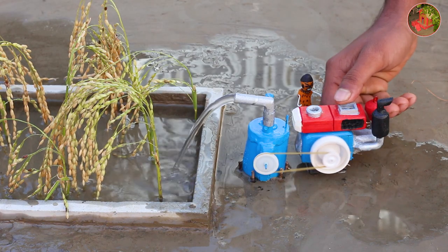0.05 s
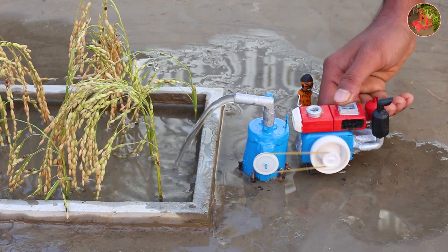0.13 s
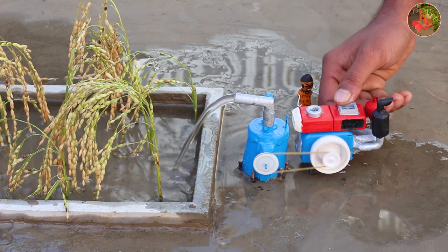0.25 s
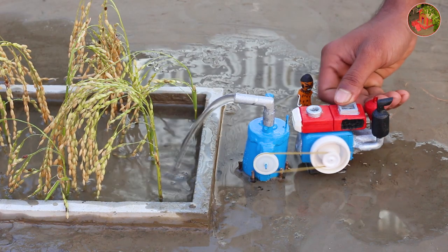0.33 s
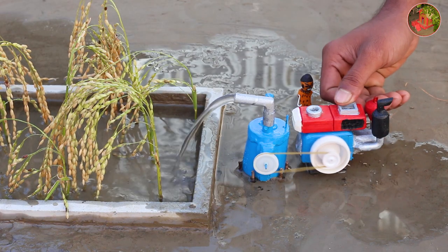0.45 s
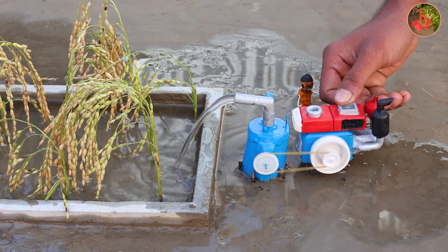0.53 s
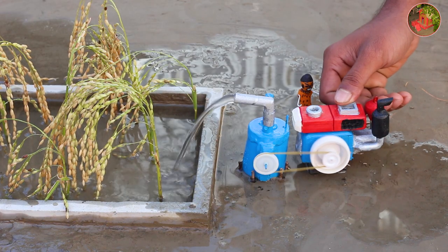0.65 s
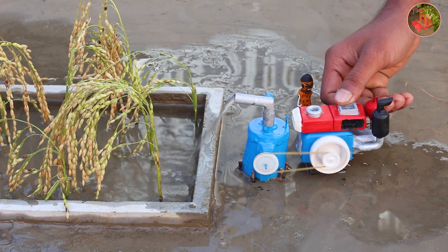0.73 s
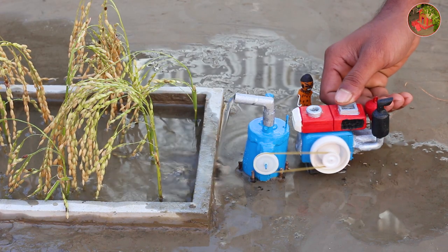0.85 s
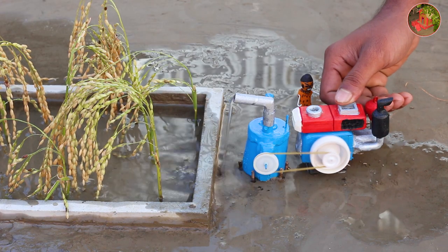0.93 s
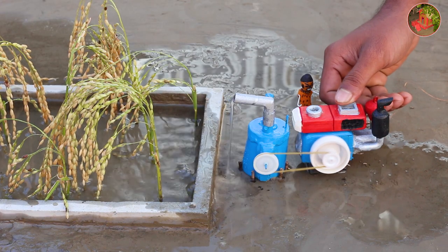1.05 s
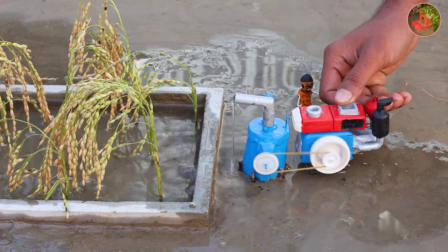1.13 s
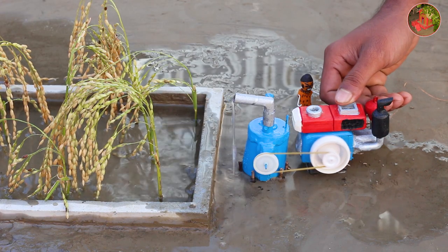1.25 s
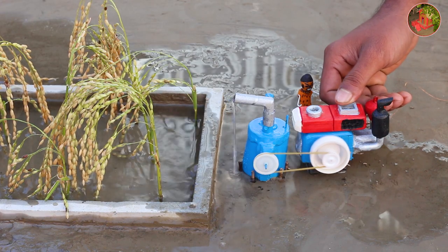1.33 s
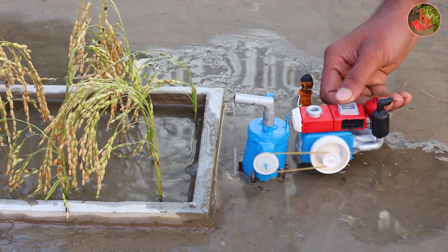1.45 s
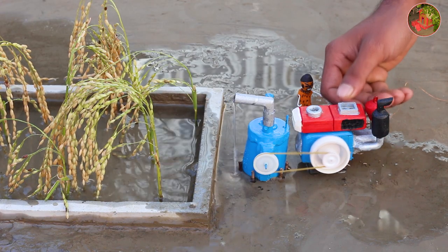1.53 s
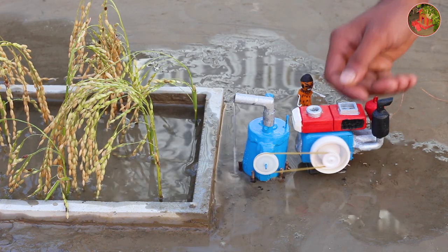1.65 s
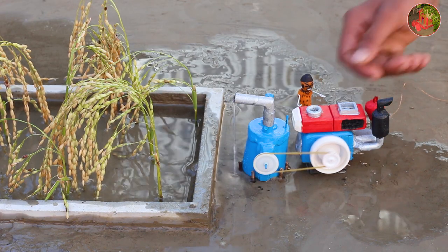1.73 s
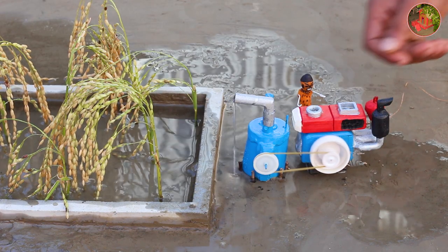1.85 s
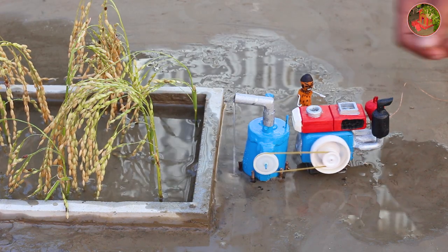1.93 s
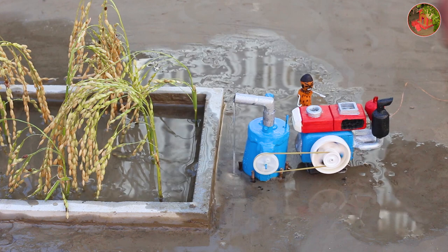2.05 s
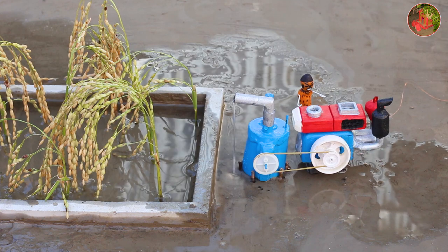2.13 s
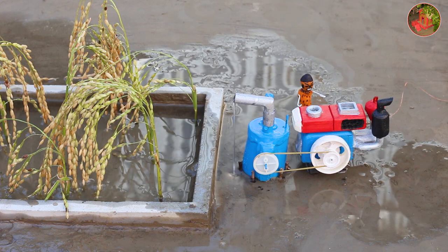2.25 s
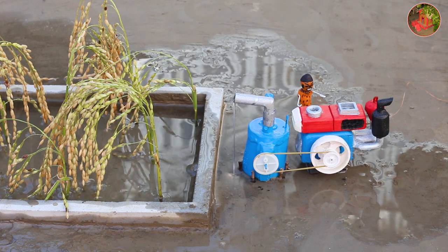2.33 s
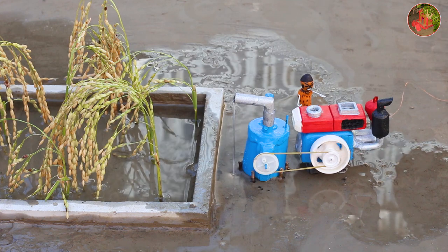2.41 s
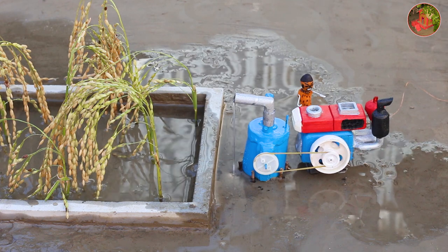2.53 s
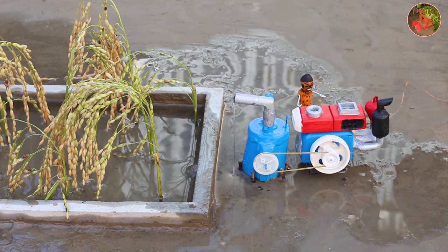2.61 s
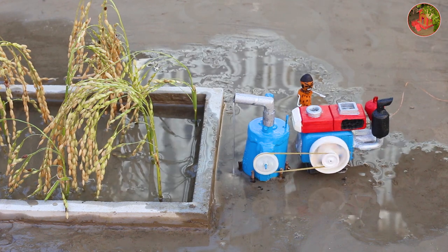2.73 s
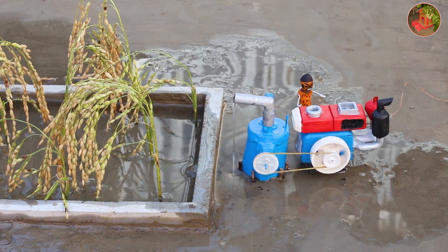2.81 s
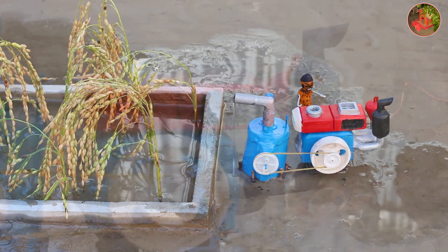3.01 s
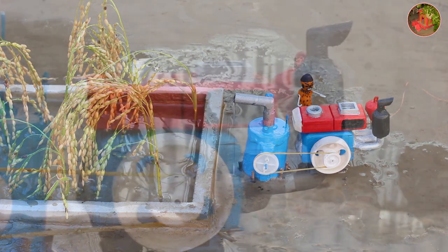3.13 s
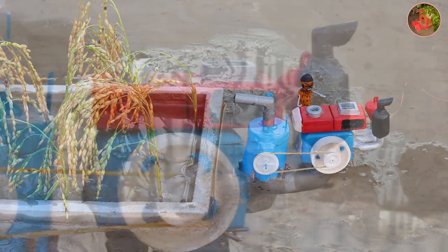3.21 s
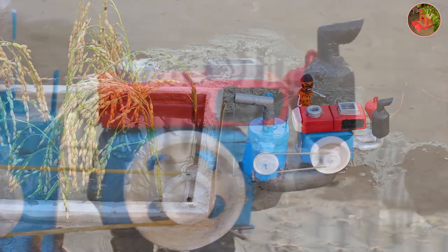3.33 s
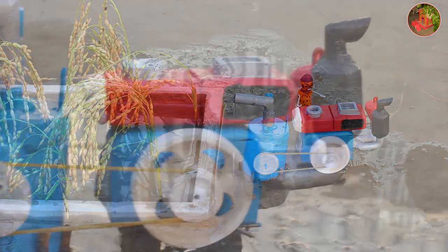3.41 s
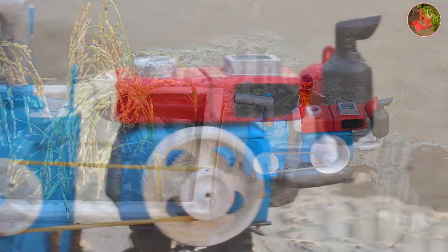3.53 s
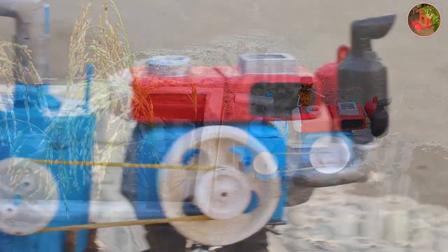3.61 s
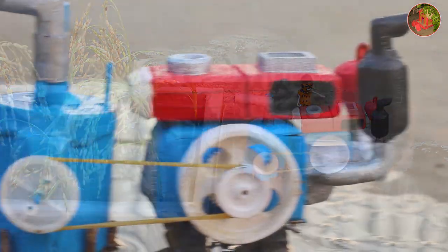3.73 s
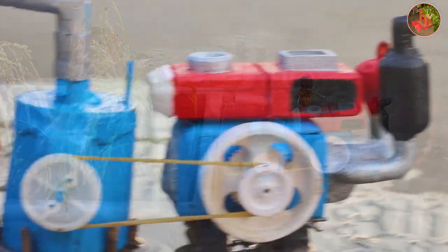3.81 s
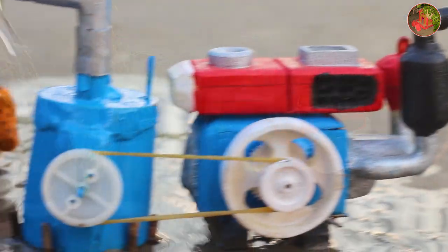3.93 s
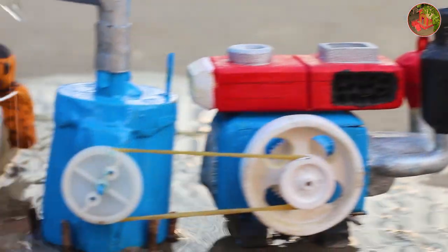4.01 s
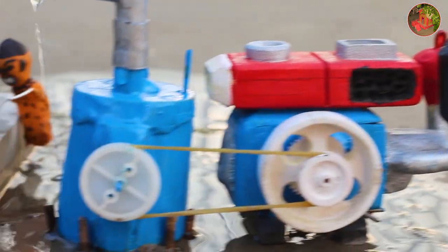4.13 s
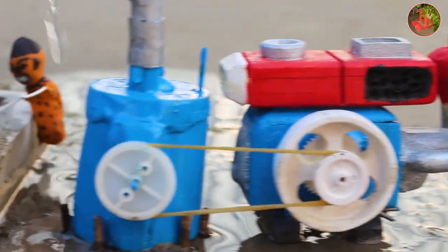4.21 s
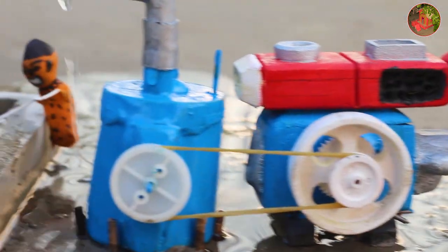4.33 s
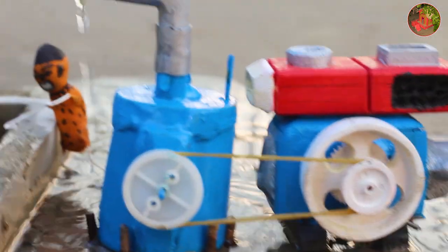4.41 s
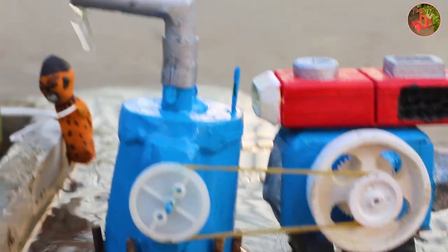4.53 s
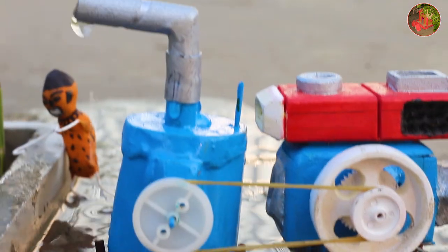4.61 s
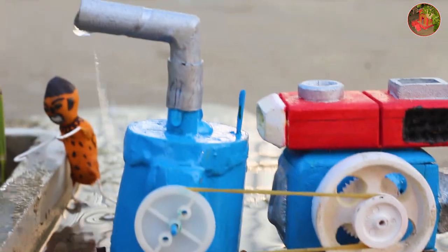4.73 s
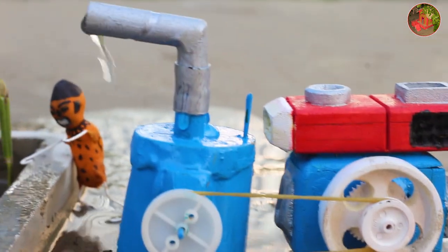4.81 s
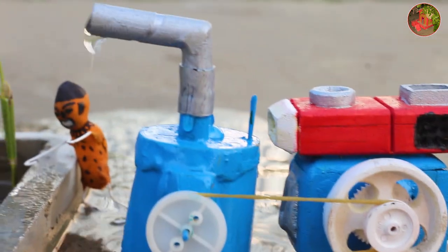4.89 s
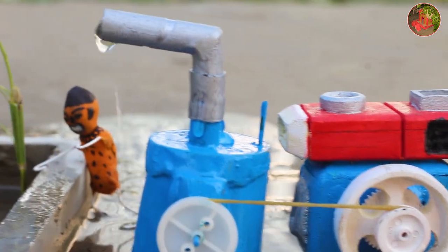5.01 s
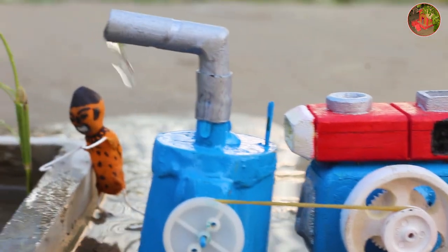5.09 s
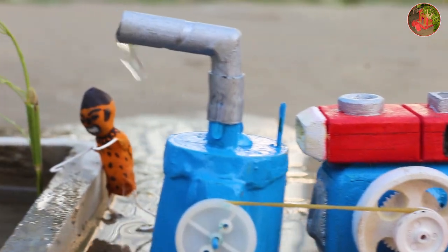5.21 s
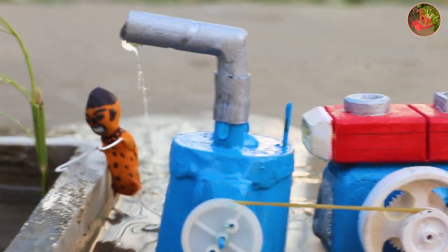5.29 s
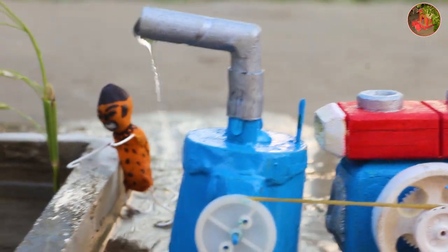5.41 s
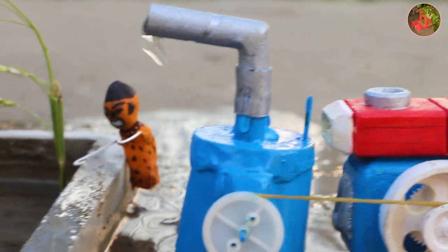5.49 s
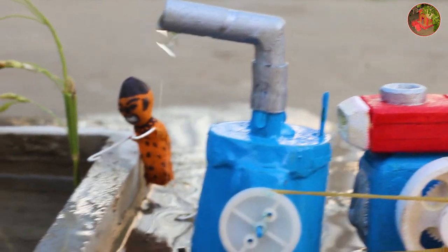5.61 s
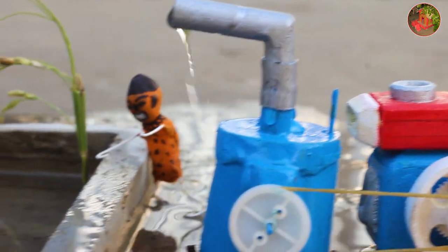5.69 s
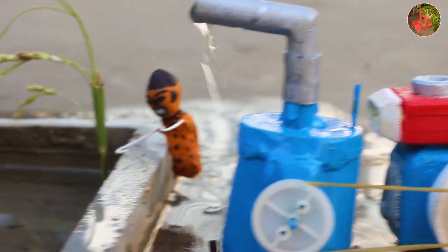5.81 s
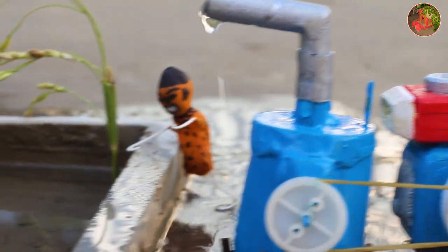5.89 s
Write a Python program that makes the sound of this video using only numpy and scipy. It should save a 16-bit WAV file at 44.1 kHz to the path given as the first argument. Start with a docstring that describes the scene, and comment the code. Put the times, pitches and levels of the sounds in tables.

```python
"""A field with a toy pump: it chugs about eleven times a second, squeaks once and dies away.
The pump is swelling noise bands at each turn; its jet is ringing bubbles, froth and spray into a trough.
Insects trill as falling sine chirps over a chorus of noise bands, with low rumble and faint hum.
A close songbird whistles slurred sines, then chatters and rasps in bands of noise around a moving pitch.
Light puffs of low noise are the wind; a far bird answers hoarsely from the right."""
import sys
import numpy as np
from scipy import signal
from scipy.fft import rfft, irfft, next_fast_len
from scipy.io import wavfile

SR = 44100
rng = np.random.default_rng(int(sys.argv[2]) if len(sys.argv) > 2 else 0)


def generate_wav(sig):
    """Save sig (samples, or channels by samples) to the path in sys.argv[1] as 16-bit PCM at SR."""
    pcm = np.round(np.clip(np.atleast_2d(sig).T, -1, 1) * 32767).astype(np.int16)
    wavfile.write(sys.argv[1], SR, pcm)


N = 262378
TIME = np.arange(N) / SR
STOP_S = 2.02   # pump gain at the middle of its final release
# spectrum of splashing water: f/Hz, relative level/dB
WATER_SPECTRUM = [(59, -58), (100, -30.5), (185, -24), (271, -16), (424, -10.5), (691, -1.5), (836, -11),
                  (1200, -4), (1420, -8), (1950, -2.5), (4290, -16), (6150, -17), (6990, -16),
                  (12700, -27.5), (16000, -32.5)]


def from_db(db):
    """Decibels to amplitude gain."""
    return 10 ** (np.asarray(db) / 20)


def rms_one(x):
    """Scale to unit rms."""
    return x / np.sqrt(np.mean(x ** 2) + 1e-20)


def curve(rows, column):
    """One table column, joined by straight lines in time."""
    rows = np.array(rows)
    return np.interp(TIME, np.sort(rows[:, 0]), rows[:, column])


def swell(t, length_s):
    """Smooth hump around t = 0; length at half height."""
    return np.cos(np.pi / 2 * np.clip(t / length_s, -1, 1)) ** 2


def humps(rows):
    """Summed gain of swells: t/s, length/s, level/dB."""
    return sum(from_db(db) * swell(TIME - s, length_s) for s, length_s, db in rows)


def gate(start_s, length_s, attack_s, release_s):
    """Attack, hold and release; length at half height."""
    rise = .5 + (TIME - start_s) / attack_s
    fall = .5 + (start_s + length_s - TIME) / release_s
    gain = np.clip(rise, 0, 1) * np.clip(fall, 0, 1)
    return gain * gain * (3 - 2 * gain)


def fade(start_s, db_per_s):
    """Full gain until a time, then an even decay in dB."""
    return from_db(-db_per_s * np.maximum(TIME - start_s, 0))


def drift(rate_hz, size=N):
    """Random wander of unit rms: straight lines between 2 * rate_hz random knots per second."""
    knots = rng.standard_normal(int(2 * rate_hz * N / SR) + 2)
    return rms_one(np.interp(TIME[:size] * 2 * rate_hz, np.arange(len(knots)), knots))


def phase_of(hz):
    """Running phase of a moving pitch, rad."""
    return 2 * np.pi * np.cumsum(hz) / SR


def band(x, low_hz, high_hz, order=2):
    """Butterworth band-pass."""
    edges_hz = np.clip([low_hz, high_hz], 12, .47 * SR)
    return signal.sosfilt(signal.butter(order, edges_hz, "band", fs=SR, output="sos"), x)


def hiss(hz, width_hz, order=2):
    """One band of noise, unit rms."""
    return rms_one(band(rng.standard_normal(N), hz - width_hz / 2, hz + width_hz / 2, order=order))


def rough_tone(phase, width_hz):
    """Band of noise carried on a moving pitch, unit rms."""
    lowpass = signal.butter(3, width_hz / 2, fs=SR, output="sos")
    grain = signal.sosfilt(lowpass, rng.standard_normal((2, N)))
    return rms_one(grain[0] * np.sin(phase) + grain[1] * np.cos(phase))


def shape(x, spectrum):
    """Filter by gains joined over log frequency, falling 20 dB/octave beyond the ends."""
    size = next_fast_len(N)
    hz, db = np.transpose(spectrum)
    octave = np.log2(np.arange(size // 2 + 1) * SR / size + 1)
    beyond = np.abs(octave - np.clip(octave, np.log2(hz[0]), np.log2(hz[-1])))
    gain = from_db(np.interp(octave, np.log2(hz), db) - 20 * beyond)
    return irfft(rfft(x, size) * gain, size)[..., :N]


def tint(x, spectrum):
    """Filter by a spectrum, then scale to unit rms."""
    return rms_one(shape(x, spectrum))


def wide(mid, side, side_db):
    """Left and right from a centre and a side signal."""
    return mid + from_db(side_db) * side * np.array([[1], [-1]])


def pan(x, balance_db):
    """Place a source by level difference; positive is left."""
    return x * from_db(np.array([[balance_db], [-balance_db]]) / 2)


def noise(spectrum, side_db):
    """Coloured stereo noise from independent centre and side."""
    return wide(*tint(rng.standard_normal((2, N)), spectrum), side_db)


def ring(clicks, hz, t60_s):
    """Two-pole resonator: each click sets a decaying sine ringing."""
    r = from_db(-60 / (t60_s * SR))
    w = 2 * np.pi * hz / SR
    return signal.lfilter([0, np.sin(w)], [1, -2 * r * np.cos(w), r * r], clicks + 1e-18)


def add(out, start_s, sound):
    """Mix a short sound in at a time."""
    at = max(int(start_s * SR), 0)
    out[..., at:at + sound.shape[-1]] += sound[..., :N - at]


def running(db, lingers_s=0):
    """Gain of one pump part: steady, dying away at a common rate, then released to silence."""
    run_s, fade_db_per_s, release_s = .75, 31, .59
    stop = np.clip(.5 + (STOP_S - TIME) / release_s, 0, 1)
    return from_db(db) * fade(run_s + lingers_s, fade_db_per_s) * stop


def each_turn(delay_s, length_s):
    """A swell at the same point of every pump turn."""
    first_turn_s, turn_s = .068, .08892
    t = (TIME - first_turn_s - delay_s + turn_s / 2) % turn_s - turn_s / 2
    return swell(t, length_s)


def machine():
    """Noise bands swell each turn: drive rasp, gulp falling in pitch, return clack; the motor whines."""
    # motor whine: f/Hz, width/Hz, relative level/dB
    whine_bands = [(7000, 16, -14.5), (7180, 440, -15)]
    # drive rasp, once a turn: f/Hz, width/Hz, relative level/dB
    drive_bands = [(7220, 1400, 1.5), (2690, 1640, 3), (10500, 5000, -16.5)]
    # gulp and clack of every turn: delay/s, length/s, f/Hz, width/Hz, relative level/dB
    stroke = [(0.026, 0.0064, 1056, 348, 6), (0.031, 0.017, 517, 130.2, 0), (0.047, 0.021, 317, 100, -5),
              (0.06, .035, 260, 69.7, -15.5), (0.076, 0.0099, 2200, 1000, 3), (0.078, 0.017, 692, 200, 1)]
    whine = sum(from_db(db) * hiss(hz, width_hz) for hz, width_hz, db in whine_bands)
    drive = sum(from_db(db) * hiss(hz, width_hz) for hz, width_hz, db in drive_bands)
    rasp = each_turn(delay_s=.0055, length_s=.008) * drive
    gulp = sum(from_db(db) * each_turn(delay_s, length_s) * hiss(hz, width_hz)
               for delay_s, length_s, hz, width_hz, db in stroke)
    gulp_and_whine = (gulp + whine) * running(-29.5, lingers_s=.11)
    return np.sqrt(2) * (gulp_and_whine + rasp * running(-27.5, lingers_s=.24))


def bubbles(per_s, cycles, spread_db, count=36):
    """Bubbles of random size and pitch, born at random, each ring down 60 dB in a number of cycles."""
    born = np.flatnonzero(rng.random(N) < per_s / SR)
    draws = rng.random((len(born), 3))
    sizes = from_db(-spread_db * np.log(.02 + draws[:, 0])) * np.sign(draws[:, 1] - .5)
    pitch_index = (draws[:, 2] * count).astype(int)
    out = np.zeros(N)
    for k, hz in enumerate(np.geomspace(550, 14000, count)):
        clicks, mine = np.zeros(N), pitch_index == k
        clicks[born[mine]] = sizes[mine]
        out += hz * ring(clicks, hz, cycles / hz)
    return tint(out, WATER_SPECTRUM)


def gurgle(per_s=220, cycles=22, rise=.34, spread_db=3, low_hz=750, high_hz=3400):
    """Middling bubbles, each rising in pitch as it nears the surface."""
    out, t = np.zeros((2, N)), np.arange(SR // 25) / SR
    for when, pitch, size, place in rng.random((int(per_s * STOP_S), 4)):
        hz = low_hz * (high_hz / low_hz) ** pitch
        age = t * hz / cycles   # 1 = 60 dB down
        tone = np.sin(phase_of(hz * (1 + rise * np.minimum(age, 1)))) * from_db(-60 * age)
        level_db = -spread_db * np.log(.043 + size)
        add(out, when * STOP_S, pan(from_db(level_db) * tone, 12 * (place - .5)))
    return band(out, 670, 9000)


def jet():
    """Jet into the trough: fine froth and a gurgle of larger bubbles over a wash of spray."""
    # stereo width of water: f/Hz, relative side level/dB
    water_width = [(60, -9), (110, -4.5), (200, -7.5), (380, -26), (700, -28.5), (1290, -14), (2380, -12.5),
                   (4400, -11.5), (8120, -9), (15000, -3)]
    froth = np.array([bubbles(per_s=3500, cycles=84, spread_db=8) for _ in range(2)])
    spray = tint(rng.standard_normal((2, N)), WATER_SPECTRUM)
    mid, side = from_db(-3.5) * froth + from_db(-4.5) * spray
    wash = wide(mid, shape(side, water_width), side_db=-3)
    return running(-18.5) * (wash + from_db(.5) * gurgle())


def insects():
    """Sine trains of falling chirps over a far chorus of noise bands, independent left and right."""
    # chirp trains: rate/Hz, start f/Hz, end f/Hz, sounding share, unevenness, relative level/dB
    trains = [(43.6, 3750, 3050, .75, .03, -50.5), (47.6, 4250, 3450, .75, .03, -53),
              (24.3, 7420, 7380, .55, .002, -53.5), (24.3, 7300, 6980, .45, .002, -58.5)]
    # far chorus: f/Hz, width/Hz, level/dB
    chorus = [(3640, 870, -51), (5865, 620, -52), (7394, 920, -54.5), (5854, 1800, -59.5),
              (12100, 3000, -76.5)]
    out = np.zeros((2, N))
    for rate_hz, start_hz, end_hz, share, uneven, db in trains:
        cycles = phase_of(rate_hz * (1 + uneven * drift(10))) / (2 * np.pi)
        turn = (cycles + rng.random()) % 1
        along = np.clip(turn / share, 0, 1)
        for side in out:
            hz = start_hz + (end_hz - start_hz) * along + 25 * drift(200)
            loud = 2 * from_db(db + drift(7.4)) * np.sin(np.pi * along)
            side += loud * np.sin(phase_of(hz))
    for side in out:
        side += sum(from_db(db) * hiss(hz, width_hz, order=4) for hz, width_hz, db in chorus)
    return out


def background():
    """Low noise rumble, wavering sine hum, a soft hiss around the bird's calls and puffs of wind."""
    # hum: f/Hz, rms level/dB
    hum_tones = [(64.6, -63), (123.8, -65), (360.7, -68.5)]
    # rumble spectrum: f/Hz, relative level/dB
    field_spectrum = [(15, -67), (25, -44), (49, -4), (129, -9.5), (212, -12.5), (357, -23), (393, -22),
                      (535, -23), (2500, -37), (3250, -71), (5500, -120)]
    # rumble stereo width: f/Hz, relative side level/dB
    field_width = [(60, -6), (110, -13.5), (200, -22), (380, -17), (700, -16), (1290, -8.5), (2380, -7),
                   (4400, -6.5), (8120, -8), (15000, 0)]
    # hiss spectrum: f/Hz, relative level/dB
    hiss_spectrum = [(150, 2), (400, 3), (900, 2), (1600, -5), (3000, -15.5), (9000, -22.5), (15000, -29.5)]
    # wind puffs: t/s, length/s, relative level/dB
    puffs = [(4.66, 0.059, -50), (4.785, 0.051, -39.5), (4.87, 0.07, -52), (5.38, 0.16, -41),
             (5.58, 0.072, -47)]
    # wind spectrum: f/Hz, relative level/dB
    puff_spectrum = [(25, -2.5), (55, 4), (110, 6), (200, -18), (400, -52)]
    hum = sum(from_db(db) * np.sqrt(2) * np.sin(phase_of(hz + 2 * drift(7.5))) for hz, db in hum_tones)
    mid, side = from_db(-57.5) * tint(rng.standard_normal((2, N)), field_spectrum)
    rumble = wide(mid, shape(side, field_width), side_db=3)
    hiss_gate = gate(3.204, 2.495, attack_s=.012, release_s=.012)
    soft_hiss = from_db(-54.5) * hiss_gate * noise(hiss_spectrum, side_db=-6.5)
    wind = pan(humps(puffs) * noise(puff_spectrum, side_db=8), balance_db=-2.5)
    return hum + rumble + soft_hiss + from_db(1.5) * wind


def splashes(plop_t60_s=.048, rise_per_s=3.055, drop_t60_s=.013, slap_t60_s=.028, slap_db=-9):
    """Large bubbles open with a noise slap and ring upward in pitch; brief bright smacks follow, mostly drops
    on the rim."""
    # large bubbles: t/s, relative level/dB, f/Hz
    plops = [(0.092, -9.5, 1124), (0.167, 3, 1960), (0.19, -1, 1726), (0.233, -7, 1530), (0.291, -5, 705),
             (0.426, -5, 1046), (0.445, -3.5, 1603), (0.469, 0, 1234), (0.496, -3, 2105),
             (0.534, -0.5, 705), (0.594, -5, 1433), (0.682, 0, 1897), (0.721, -7, 1164),
             (0.777, -7.5, 1640)]
    # brief bright smacks, mostly drops on the rim: t/s, relative level/dB
    drops = [(0.0992, -3), (0.1782, -10.5), (0.334, -9), (0.3905, -9.5), (0.4708, -9.5), (0.5604, -8),
             (0.6018, -10), (0.622, -11.5), (1.0963, -17.5)]
    plop_trim_db, drop_trim_db = -3, -3
    out, t = np.zeros((2, N)), np.arange(SR // 10) / SR
    for s, db, hz in plops:
        tone = np.sin(phase_of(hz * (1 + rise_per_s * (t - .004)))) * (1 - np.exp(-t / .0003))
        slap = rms_one(band(rng.standard_normal(len(t)), .73 * hz, .75 * hz))
        slap = slap * from_db(slap_db - 60 * t / slap_t60_s)
        plop = from_db(db + plop_trim_db) * (from_db(-60 * t / plop_t60_s) * tone + slap)
        add(out, s, pan(plop, rng.normal(0, 4.9)))
    for s, db in drops:
        decay = from_db(db + drop_trim_db - 60 * t / drop_t60_s)
        smack = band(rng.standard_normal((2, len(t))) * decay, 2900, 12000)
        add(out, s, wide(*smack, side_db=-8))
    return out


def dulled(x):
    """The treble dies away sooner than the rest."""
    low = signal.sosfilt(signal.butter(2, 10000, fs=SR, output="sos"), x)
    return low + (x - low) * fade(1.315, db_per_s=27)


def squeak():
    """Steady tones over a dull noise knock; a wobbling shriek as it catches and as it lets go."""
    # ringing tones: f/Hz, relative level/dB
    tone_table = [(4436, 1.5), (5081, -2.5), (9280, -12.5)]
    start_s, length_s, shriek_s, edge_s = .8282, .0238, .0034, .001
    shriek_hz, wobble = 6380, .05
    shriek = np.sqrt(2) * np.sin(phase_of(shriek_hz * (1 + wobble * drift(500))))
    shriek = shriek + .33 * hiss(8600, 7000)
    tones = sum(from_db(db) * np.sin(2 * np.pi * hz * TIME) for hz, db in tone_table)
    knock = hiss(1600, 2720) + .26 * hiss(270, 360)
    whole = gate(start_s, length_s, edge_s, edge_s)
    middle = gate(start_s + shriek_s, length_s - 2 * shriek_s, edge_s, edge_s)
    ringing = from_db(-15.5) * tones + from_db(-19.5) * knock
    return from_db(-7.5) * shriek * (whole - middle) + ringing * whole


def song_notes():
    """Envelope, level/dB and pitch/Hz of every whistled note: three long slurs, then short bends."""
    # long slurs: t/s, f/Hz, level/dB
    dipping = [(3.535, 1895, -36), (3.581, 1562, -22), (3.623, 1612, -23), (3.651, 1807, -22),
               (3.671, 1834, -11), (3.705, 1970, -26.5), (3.73, 1910, -36)]
    arching = [(3.86, 2085, -50), (3.878, 2188, -32.5), (3.942, 2500, -21), (3.964, 2512, -16.5),
               (3.992, 2115, -14.5), (4.008, 2187, -14.5), (4.03, 2150, -51.5)]
    falling = [(4.62, 3210, -54), (4.63, 3020, -43), (4.666, 2827, -24.5), (4.7, 2660, -34.5),
               (4.716, 2644, -20), (4.768, 2504, -21), (4.908, 2401, -20), (4.925, 2180, -40)]
    # short notes: t/s, length/s, level/dB, level change over note/dB, start f/Hz, middle f/Hz, end f/Hz
    short_notes = [(3.209, .085, -42, -10, 1900, 1570, 1430), (3.252, 0.024, -43, 10, 2650, 2510, 2440),
                   (3.296, 0.15, -32, -12.5, 2143, 1897, 1820), (3.316, .115, -52, 5, 1285, 1320, 1320),
                   (4.328, 0.061, -34, 15.5, 2190, 2140, 2012), (4.388, 0.11, -48, -8, 1870, 1695, 1810),
                   (4.426, 0.043, -23.5, 2.5, 2084, 2128, 2130), (4.487, .044, -21, 5, 2163, 2164, 2134),
                   (5.16, 0.12, -47, -4.5, 8370, 9000, 7700)]
    attack_s, release_s = .017, .027
    for slur in (dipping, arching, falling):
        start_s, end_s = slur[0][0], slur[-1][0]
        yield gate(start_s, end_s - start_s, attack_s, release_s), curve(slur, 2), curve(slur, 1)
    for s, length_s, db, change_db, *bend_hz in short_notes:
        along = (TIME - s) / length_s
        pitch_hz = np.polyval(np.polyfit([0, .5, 1], bend_hz, 2), along)
        yield gate(s, length_s, attack_s, release_s), db + change_db * along, pitch_hz


def whistles(flutter_hz=68, waver_hz=6, soft_waver_hz=50, blur_hz=200, rush_db=-48.5):
    """Near-sine notes with a rush of air and blurred upper overtones; soft ones flutter and waver more."""
    # overtones: multiple of pitch, level re fundamental/dB
    overtones = [(2, -37), (3, -42), (4, -46), (5, -43), (6, -49)]
    # air in the whistle: f/Hz, relative level/dB
    rush_spectrum = [(2000, 0), (4000, 8), (7000, -16), (9500, -2.5), (11500, -5), (12800, -5),
                     (15000, -10)]
    out, effort = np.zeros(N), np.zeros(N)
    blur = [np.ones(N)] + [rough_tone(0 * TIME, blur_hz) for _ in overtones[1:]]
    for envelope, note_db, hz in song_notes():
        on = np.flatnonzero(envelope)
        size = len(on)
        softness = np.clip((-21 - note_db[on].max()) / 14, .06, .8)
        flutter = np.sin(phase_of(flutter_hz * (1 + .17 * drift(27, size))))
        level_db = note_db[on] + 1.4 * softness * drift(60, size)
        loud = envelope[on] * from_db(level_db) * (1 + softness * flutter)
        phase = phase_of(hz[on] + (waver_hz + soft_waver_hz * softness) * drift(250, size))
        out[on] += np.sqrt(2) * loud * np.sin(phase)
        if hz[on].mean() < SR / 12:   # only the low notes carry overtones and air
            effort[on] += loud * (1 + 12 * softness)   # soft notes are the airiest
            for k, (multiple, db) in enumerate(overtones):
                out[on] += np.sqrt(2) * from_db(db) * loud * blur[k][on] * np.sin(multiple * phase)
    return out, from_db(rush_db) * np.sqrt(effort) * noise(rush_spectrum, side_db=-6.5)


def chatter(uneven_s=.0012, grain_db=2):
    """Bursts of quick rough chips, each falling in pitch."""
    # bursts: t/s, length/s, relative level/dB
    bursts = [(4.982, 0.048, -29), (5.032, .014, -32), (5.051, 0.037, -28), (5.104, 0.034, -28.5)]
    # bands: multiple of pitch, width/Hz, relative level/dB
    chatter_bands = [(0.704, 616, -3), (0.998, 330, 0.5), (1.29, 686, -9.5), (2.029, 810, -11)]
    chip_hz, chip_s, fall_octaves, gap_db = 5120, .0161, .14, 3.5
    loud, along = np.zeros(N), np.zeros(N)
    clock = TIME + uneven_s * drift(30)
    for s, length_s, db in bursts:
        loud += from_db(db) * gate(s, length_s, attack_s=.0099, release_s=.033)
        along = np.where(TIME >= s, (clock - s) / chip_s % 1, along)
    phase = phase_of(chip_hz * 2 ** (fall_octaves * (.5 - along)))
    chips = from_db(grain_db * drift(200) - gap_db * np.cos(np.pi * along) ** 2)
    voice = sum(from_db(db) * rough_tone(share * phase, width_hz) for share, width_hz, db in chatter_bands)
    return loud * chips * voice


def harsh_calls(buzz_hz=95):
    """Chatter, then a buzzing rasp of noise bands that holds, then fades as its pitch rises ever faster."""
    # rasp bands: multiple of pitch, width/Hz, relative level/dB
    rasp_bands = [(1, 350, 1), (.7, 720, -5), (1.03, 4000, -11.5), (1.7, 820, -22), (2.01, 1100, -17.5)]
    start_s, length_s, hold_s, edge_s = 5.308, .225, .095, .044
    start_hz, rise_hz = 5575, 689
    buzz = 1 + .23 * np.sin(phase_of(buzz_hz * (1 + .325 * drift(30))))
    along = np.clip((TIME - start_s) / length_s, 0, 1)
    phase = phase_of(start_hz + rise_hz * along ** 2)
    rasp = sum(from_db(db) * rough_tone(share * phase, width_hz) for share, width_hz, db in rasp_bands)
    loud = from_db(-35) * gate(start_s, length_s, edge_s, edge_s) * fade(start_s + hold_s, db_per_s=91)
    return chatter() + loud * buzz * rasp


def outdoors(x, echo_db=-21, tail_db=-29, t60_s=.58):
    """One near echo and a faint decaying scatter from plants and banks, by convolution."""
    t = np.arange(SR) / SR
    scatter = rng.standard_normal((2, SR)) * from_db(-60 * t / t60_s) * (t > .012)
    response = from_db(tail_db) * scatter / np.sqrt(np.sum(scatter ** 2) / 2)
    response[:, int(.043 * SR)] += from_db(echo_db)
    return signal.fftconvolve(x[None], response, axes=1)[:, :N]


def bird(song_side_db=-13, harsh_side_db=-8):
    """Close calls with a wandering stereo side; noise modulation breaks the whistle into burrs."""
    # burrs: t/s, length/s, modulation depth/dB
    burrs = [(3.7, 0.027, -21), (3.995, 0.03, -33), (4.385, 0.0069, -13)]
    (song, rush), harsh = whistles(), harsh_calls()
    song = song * (1 + humps(burrs) * hiss(260, 150))
    song_side = signal.hilbert(song, next_fast_len(N))[:N].imag * drift(15)   # 90 degrees out of phase
    harsh_side = harsh * drift(300)
    direct = pan(wide(song, song_side, song_side_db), balance_db=.5) + wide(harsh, harsh_side, harsh_side_db)
    return direct + rush + outdoors(song + harsh)


def answers():
    """A far bird off to the right replies with hoarse rising bands of noise."""
    # answers: t of peak/s, length/s, relative level/dB, start f/Hz
    replies = [(5.608, 0.096, -41, 3280), (5.812, 0.1, -39.5, 3260), (5.919, 0.031, -48, 4900)]
    rise_octaves_per_s = 2.6
    out = np.zeros(N)
    for s, length_s, db, hz in replies:
        age_s = np.clip(TIME - s + length_s / 2, 0, 2 * length_s)
        phase = phase_of(hz * 2 ** (rise_octaves_per_s * age_s))
        out += from_db(db) * swell(TIME - s, length_s) * rough_tone(phase, width_hz=1000)
    return pan(band(out, 3130, 7000, order=4), balance_db=-5)


def scene():
    """The pump in front, the bird close by, the field all round."""
    pump = dulled(machine() + jet()) + band(splashes(), 370, 19000) + squeak()
    return pump + bird() + answers() + insects() + background()


def record(dry):
    """Clip at full scale, then low-pass steeply."""
    lowpass = signal.ellip(10, .2, 80, 16300, fs=SR, output="sos")   # order, ripple/dB, stop/dB, f/Hz
    return signal.sosfilt(lowpass, np.clip(dry, -1, 1))


dry = scene()
out = record(dry)
generate_wav(out)
```